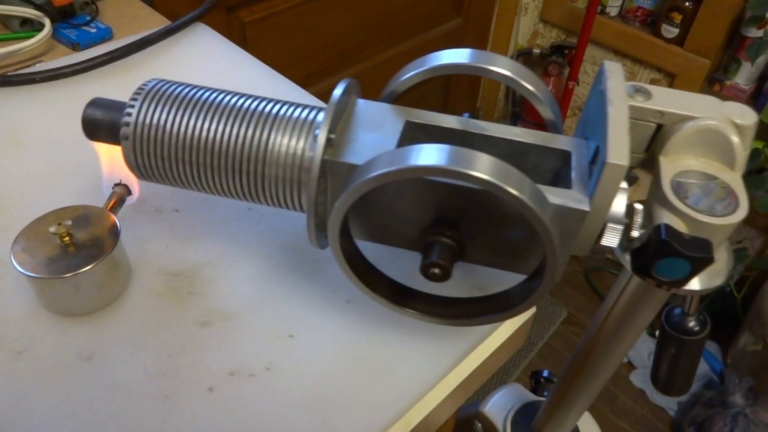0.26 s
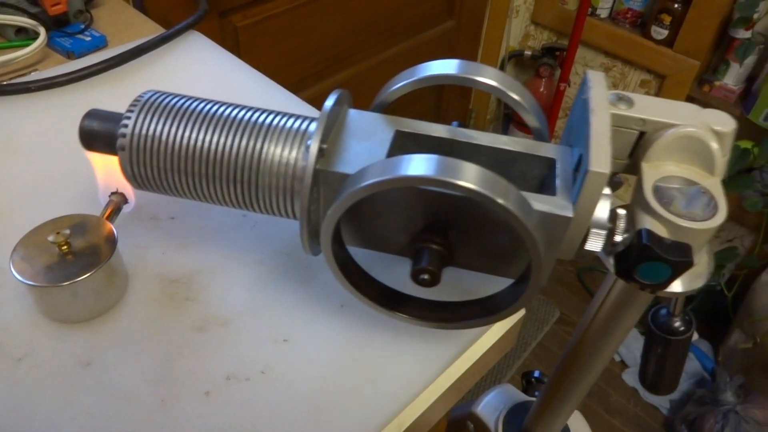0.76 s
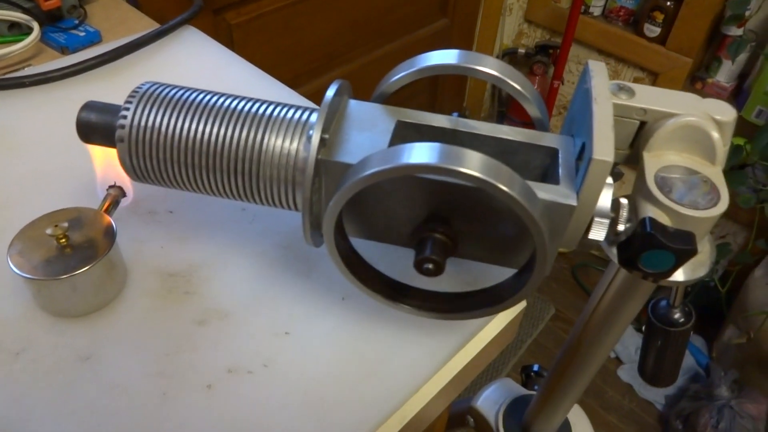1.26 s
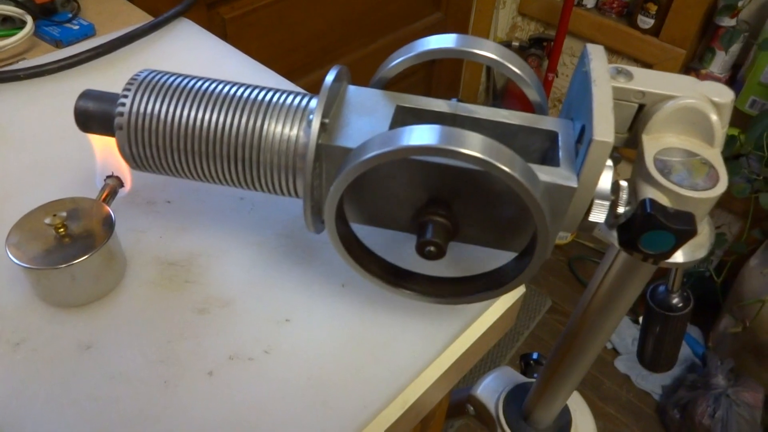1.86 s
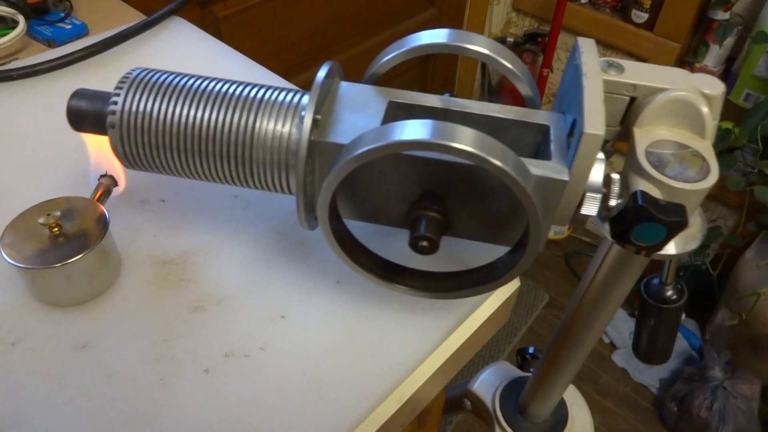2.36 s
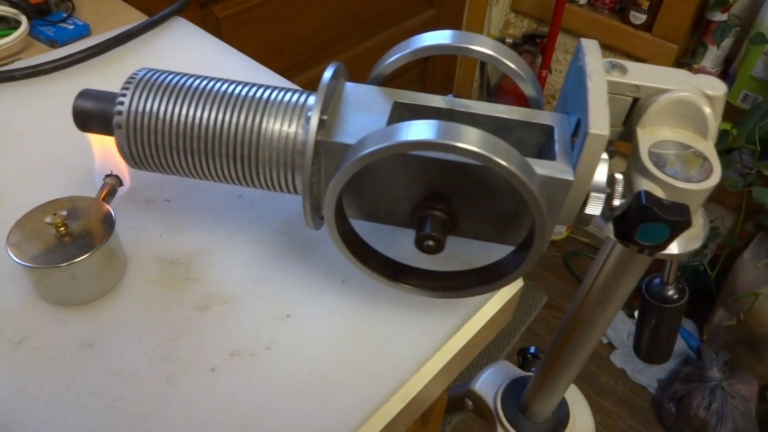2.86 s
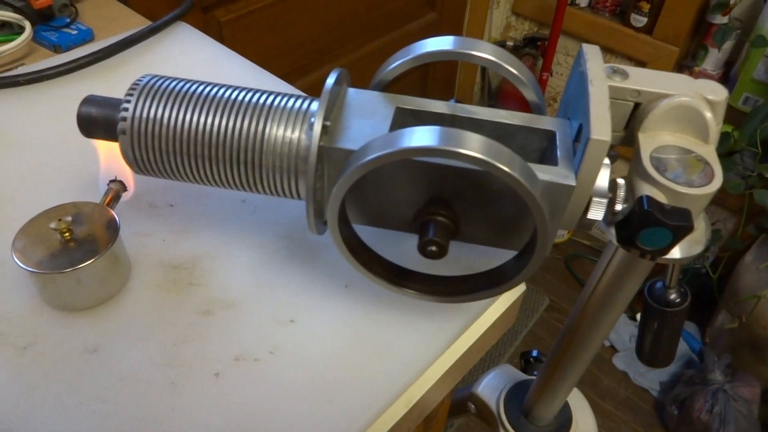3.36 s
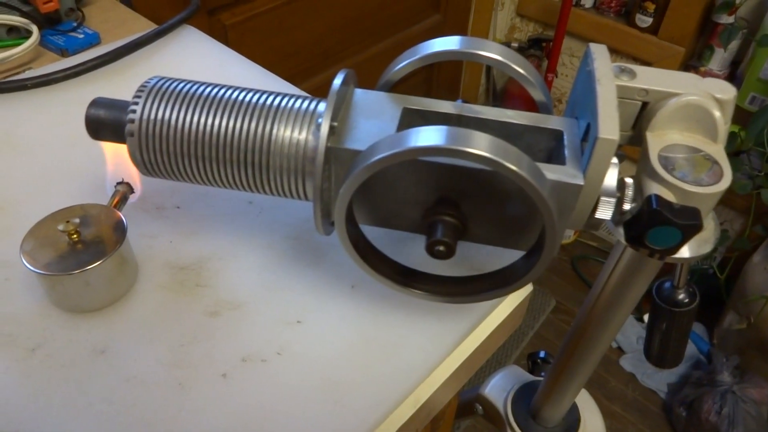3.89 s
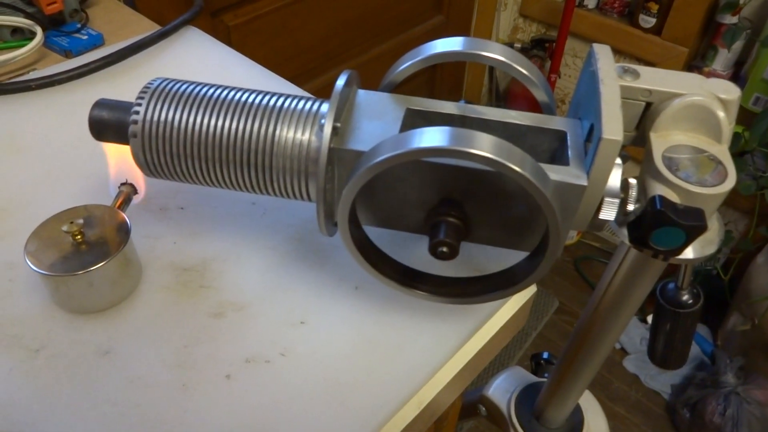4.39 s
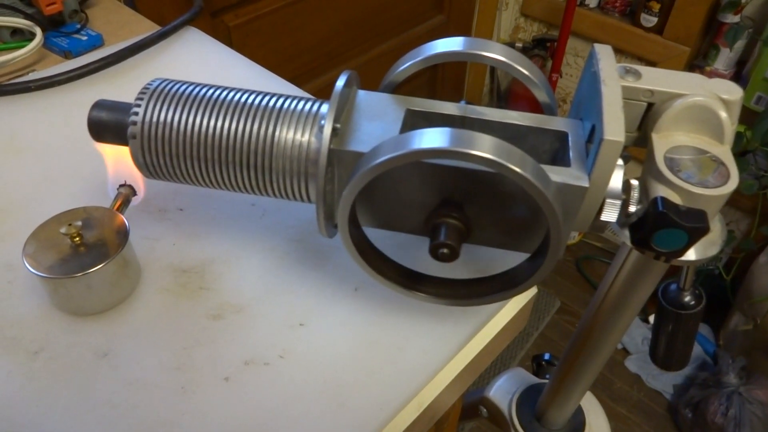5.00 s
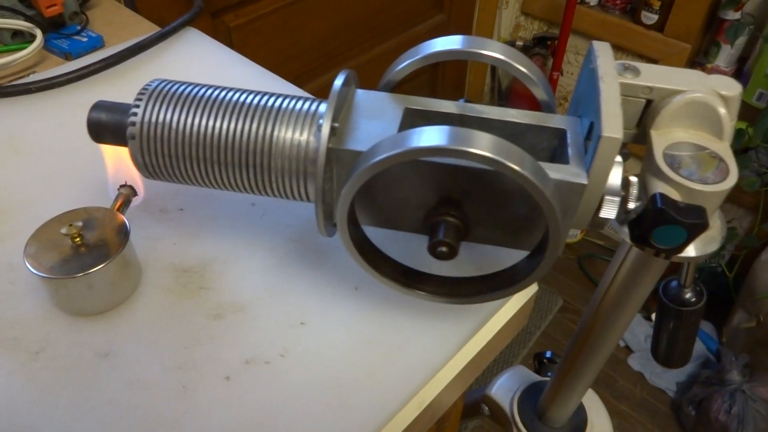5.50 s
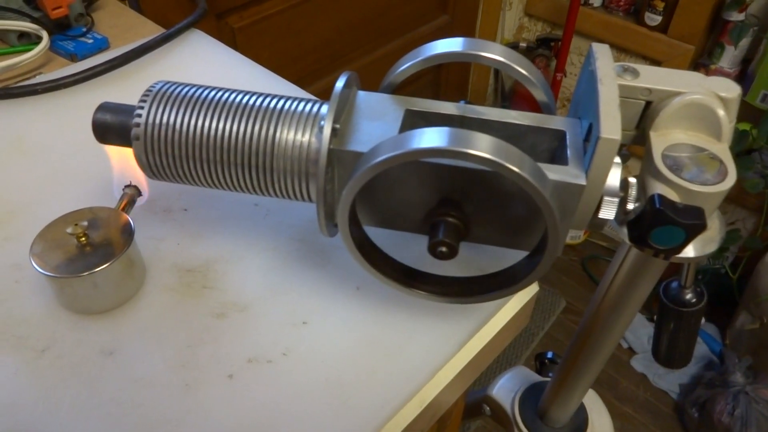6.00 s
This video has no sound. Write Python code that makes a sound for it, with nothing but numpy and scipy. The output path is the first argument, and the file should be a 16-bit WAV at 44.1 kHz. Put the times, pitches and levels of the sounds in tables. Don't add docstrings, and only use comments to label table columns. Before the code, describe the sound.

Rapid, even mechanical rattle of a little flywheel engine, hard dry clicks about fifty-seven a second, with a ringing metallic hum between them.

```python
import sys
import numpy as np
from scipy import signal
from scipy.fft import rfft, irfft, next_fast_len
from scipy.io import wavfile
from scipy.ndimage import uniform_filter1d

SR = 44100
rng = np.random.default_rng(int(sys.argv[2]) if len(sys.argv) > 2 else 0)


def makeup_ratio(level_db):
    decades = np.asarray(level_db, float) / 20
    return 10 ** decades


def to_wav(s):
    ch = np.atleast_2d(s).T
    pcm = np.round(np.clip(ch, -1, 1) * 32767)
    wavfile.write(sys.argv[1], SR, pcm.astype(np.int16))


N = 275565


def evened(x):
    return x / np.sqrt(np.mean(x ** 2) + 1e-20)


def read(points, hz):
    f, value = np.transpose(points)
    return np.interp(np.log(hz + 1), np.log(f + 1), value)


def colour(x, points):
    size = next_fast_len(len(x))
    gain = makeup_ratio(read(points, np.fft.rfftfreq(size, 1 / SR)))
    return irfft(rfft(x, size) * gain, size)[:len(x)]


def add(mix, s, sound):
    at = round(s * SR)
    part = mix[max(at, 0):][:max(len(sound) + min(at, 0), 0)]
    part += sound[max(-at, 0):][:len(part)]


# time_s, speed_turns_per_s
FLYWHEEL_SPEED = [(-.2, 14.0892), (1.1, 14.2177), (1.9, 14.3047), (2.5, 14.2987), (3., 14.3416),
                  (4., 14.368), (4.6, 14.3904), (5.2, 14.427), (6.4, 14.4608)]
START_TURN, LAST_TURN = -3.9076, 88


def crank():
    step_s = 1e-4
    s = np.arange(FLYWHEEL_SPEED[0][0], FLYWHEEL_SPEED[-1][0], step_s)
    return s, START_TURN + np.cumsum(np.interp(s, *np.transpose(FLYWHEEL_SPEED))) * step_s


# time_s, extra_db
SQUARE_HITS = [(1.73, 6), (1.80, 9), (1.94, 6), (2.43, 4), (2.57, 4), (3.41, 4), (3.69, 4), (4.66, 4),
               (4.80, 6), (5.64, 4)]


def loose_pin(t, now, level_db, detune):
    pin_hz, t60_s = 4770, .035
    square_db = sum(db for when, db in SQUARE_HITS if 0 < when - now < .06)
    decay = makeup_ratio(level_db + square_db - 60 * t / t60_s)
    return decay * np.sin(2 * np.pi * pin_hz * (1 + detune) * t)


FRAME_MODES = [(400, 4.4, -57, -6, 22, 0), (712, 14.3, -60, 4, 69, -2), (892, 19.6, -45, 13.5, 73.5, 3),
               (1106.7, 19.3, 150, -18, -152, 75), (1210.8, 84, 44, -15, -29, 54),
               (1246.6, 37.5, -79, 62, 11, -31), (1301.4, 31.8, -36, -17, 51, -81),
               (1656, 17.6, -57, -6, 31, -10), (1901, 8.9, -48, 19, 114, -12), (2184, 8.9, -60, -12, 51, -28),
               (2660, 14.7, 44, -9, 83, -11), (2960, 5.8, 201, 1, -203, -26),
                  (3436, 5.4, 38, -57, -140, -14), (3702, 14, -61, -12, 57, 5),
                  (3846, 8.5, 23, -96, 74, -1), (4167, 17.7, 185, -14, 24, -1),
                  (4510, 6.5, -67, 11, -177, -16), (4800, 20.7, -54, 9, 43, -8),
                  (6046, 6.8, -101, -38, -11, 6), (6570, 4.2, 26, 116, 50, -25),
               (7844, 34, -35, -9, 34, 15), (8160, 11.3, 178, -15, 70, 46),
                  (8360, 5.9, -180, 81, -88, -2), (9450, 2.4, -9, -33, -7, -44),
                  (10290, 32, -23, 14, 17, -1), (10830, 7.5, 118, 10, -45, 9), (12200, 14, -22, 5, 31, 4),
                  (13820, 11, -95, 0, -17, 1), (15260, 9, -66, 0, 2, -1), (15600, 8.0, 74, 1, -5, 0)]
# angle_turns, drift_turns_per_s, bend_turns_per_s2, scatter_ms
KNOCK_ANGLES = [
    (.00009, -.00066, .00009, .02),
    (.21197, .00478, -.00014, .25),
    (.40155, -.00067, .00005, .03),
    (.81393, -.00087, .00006, .04),
]
# blow_db, spread_db, low_mode_drift_db_per_s, high_mode_drift_db_per_s, loose_pin_db
KNOCK_BLOWS = [
    (.3, .3, .17, -.15, -48),
    (.4, .4, .1, -.3, -52),
    (.4, .35, .2, -.5, -35),
    (.8, .45, .35, .2, -55),
]
# level_db, dullness (0-1)
FACE_CRACKS = [
    (-19.5, 0.18),
    (-29.5, .98),
    (-23.5, 0.12),
    (-40, 0.2),
]
# frequency_hz, gain_db
CRACK_SPECTRUM = [(2000, -21), (4500, 5), (6000, -0.5), (8000, 4), (11000, -1.5), (13000, -15), (16000, 0)]


def knocks():
    settle_hz, settle_db, settle_s = 4040, -5.5, 2
    s, turn = crank()
    hz, t60_ms, *swings = np.transpose(FRAME_MODES)
    steps = np.arange(1050)[:, None] / SR
    fade = np.clip((steps[-1] - steps[:, 0]) / .006, 0, 1)
    height = np.log(hz / hz[0]) / np.log(hz[-1] / hz[0])
    rings, cracks = np.zeros(N), np.zeros(N)
    for place, blow, face, swing in zip(KNOCK_ANGLES, KNOCK_BLOWS, FACE_CRACKS, swings):
        angle, drift, bend, scatter_ms = place
        blow_db, spread_db, low_db, high_db, pin_db = blow
        crack_db, dull = face
        draws = rng.standard_normal((LAST_TURN + 2, 3, len(hz)))
        wander = evened(uniform_filter1d(draws, size=16, axis=0))
        lucks = .8 * wander + .6 * rng.standard_normal(draws.shape)
        surface = rng.standard_normal(len(steps))
        for k, luck in enumerate(lucks, -1):
            now = np.interp(k, turn, s)
            since_middle = now - N / SR / 2
            at = np.interp(k + angle + drift * now + bend * now ** 2, turn, s)
            at += scatter_ms / 1000 * draws[k + 1, 0, 0]
            t = np.maximum(steps + round(at * SR) / SR - at, 0)
            t_line = t[:, 0]
            rise = fade * makeup_ratio(blow_db + spread_db * luck[0, 1]) * (1 - np.exp(-t_line / .000106))

            tuned_hz = hz * (1 + .0009 * luck[1])
            shares_db = .5 * luck[2] + (low_db + (high_db - low_db) * height) * since_middle
            shares_db += settle_db * np.exp(-now / settle_s - ((hz - settle_hz) / 200) ** 2)
            modes = swing / 1000 * makeup_ratio(-60e3 * t / t60_ms) * np.sin(2 * np.pi * tuned_hz * t)
            ring = modes @ makeup_ratio(shares_db)
            pin = loose_pin(t_line, now, pin_db + 4.5 * draws[k + 1, 0, 2], .006 * luck[0, 3])
            add(rings, at, rise * (ring + pin))

            rough = 0.88 * surface + 0.74 * rng.standard_normal(len(t))
            grit = signal.lfilter([1, np.clip(dull, 0, 1)], 1, rough)
            crack = makeup_ratio(crack_db + high_db * since_middle) * grit * np.exp(-t_line / 0.0017)
            add(cracks, at, rise * crack)
    return rings + colour(cracks, CRACK_SPECTRUM)


def contacts(per_s, spread_db, alike):
    s, turn = crank()
    starts = np.interp(np.arange(-2, LAST_TURN + 1), turn, s)
    shape = (len(starts), round(SR * (starts[1] - starts[0])))
    sizes = makeup_ratio(spread_db * np.minimum(rng.exponential(1, (2, *shape)), 5))
    sizes *= rng.random((2, *shape)) < per_s / SR
    habit = sizes[0, 0] * evened(uniform_filter1d(rng.standard_normal(shape), size=30, axis=0))
    fresh = sizes[1] * rng.standard_normal(shape)
    alike = np.clip(alike, 0, 1)
    turns = np.sqrt(alike) * evened(habit) + np.sqrt(1 - alike) * evened(fresh)
    out = np.zeros(N)
    for at, hits in zip(starts, turns):
        add(out, at, hits)
    return out


def stirred(turn, levels_db, lags, sharp, rest_db):
    power = makeup_ratio(rest_db) ** 2
    for (angle, *_), db, lag in zip(KNOCK_ANGLES, levels_db, lags):
        u = (turn - angle) % 1 / max(lag, .01)
        swell = (u * np.exp(1 - u)) ** sharp
        power = power + (makeup_ratio(db) * swell) ** 2
    return np.sqrt(power)


# chatter_db, chatter_lag_turns, hum_db, hum_lag_turns
LOOSE_PARTS = [
    (-34, 0.084, -40, 0.084),
    (-36, 0.094, -34.5, 0.083),
    (-35.5, .1, -34.5, 0.13),
    (-44, 0.14, -32.5, 0.051),
]
# frequency_hz, gain_db
CHATTER_SPECTRUM = [(300, -20), (900, -5.5), (2600, -0.5), (4400, -3.5), (6500, -16), (8200, -6),
                    (9500, -10.5), (15500, -18.5)]
# frequency_hz, width_hz, level_db
HUM_MODES = [(1070.6, 55, -6), (1164, 15, 5.5), (1244, 31, 2.5), (1348, 42, 4.5)]


def slack():
    turn = np.interp(np.arange(N) / SR, *crank())
    chatter_db, chatter_lag, hum_db, hum_lag = np.transpose(LOOSE_PARTS)
    t = np.arange(2000) / SR
    body = np.zeros(len(t))
    for hz, width, db in HUM_MODES:
        decay = np.exp(-np.pi * width * t)
        body += makeup_ratio(db) * np.sqrt(width) * decay * np.sin(2 * np.pi * hz * t)
    hum = contacts(2000, 0.69, 0.85) * stirred(turn, hum_db, hum_lag, sharp=2.42, rest_db=-63)
    chatter = evened(colour(contacts(6000, 1.9, 0.51), CHATTER_SPECTRUM))
    chatter *= stirred(turn, chatter_db, chatter_lag, sharp=1.04, rest_db=-53)
    return chatter + signal.oaconvolve(hum, body / np.linalg.norm(body))[:N]


# frequency_hz, gain_db
SMALL_BODY = [(60, -40), (110, -7), (160, -4.5), (240, 0), (450, 0.5), (800, 0.68), (16000, 1.53)]


def engine():
    return colour(knocks() + slack(), SMALL_BODY)


# frequency_hz, t60_s
SHOP_DECAY = [(200, 0.14), (1000, 0.2), (4000, 0.087), (9000, 0.26), (16000, 0.054)]


def tail(start_ms):
    taps, gap = np.zeros(SR // 2), 20
    at = np.arange(round(start_ms * SR / 1000), len(taps) - gap, gap)
    places = at + rng.integers(0, gap, len(taps))[:len(at)]
    taps[places] = rng.choice([-1., 1.], len(taps))[:len(at)]
    hz, t, z = signal.stft(taps, SR, nperseg=256)
    decay = makeup_ratio(-60 * t / read(SHOP_DECAY, hz)[:, None])
    taps = signal.istft(z * decay, SR, nperseg=256)[1]
    return taps / np.linalg.norm(taps)


# delay_ms, signed_share
BENCH_ECHOES = [(1.29, -0.12), (2.31, -0.08), (3.06, 0.04), (3.7, -0.09), (3.92, 0.05), (4.08, -0.05),
                (5.51, -0.04), (7.21, -0.04), (7.55, 0.07), (8.32, -0.04)]
# frequency_hz, gain_db
WALL_RETURN = [(200, -15), (700, -25.5), (1200, -12), (2500, -10), (4500, -10), (8000, -21.5),
               (16000, -15.5)]


def workshop(x):
    wall_ms, wall_db = 8.6, -17.5
    taps = colour(tail(wall_ms), WALL_RETURN)
    for ms, share in BENCH_ECHOES:
        taps[round(ms * SR / 1000)] += share
    slap = np.diff(rng.standard_normal(200)) * np.exp(-np.arange(199) / 19.0)
    add(taps, wall_ms / 1000, makeup_ratio(wall_db) * slap / np.linalg.norm(slap))
    return signal.oaconvolve(x, taps)[:N]


# frequency_hz, density_db_per_hz
RUMBLE_SPECTRUM = [(30, -1), (50, 0), (100, -18), (125, -4), (250, -4), (400, -13.5), (800, -13),
                   (1500, -28)]
# frequency_hz, level_db (rms)
MAINS_LINES = [(59.2, -53), (118.7, -65.5), (302.1, -56.5), (159.4, -59.5), (249.8, -60.5), (368.3, -62),
               (15545, -66)]
# frequency_hz, gain_db
HISS_SPECTRUM = [(300, 1.5), (3000, -0.5), (8000, -7), (11000, -26), (13000, -16), (16000, -16)]


def background():
    t = np.arange(N) / SR
    lines = np.zeros(N)
    for hz, db in MAINS_LINES:
        lines += makeup_ratio(db) * np.sqrt(2) * np.sin(2 * np.pi * (hz * t + rng.random()))
    rumble = makeup_ratio(-54) * evened(colour(rng.standard_normal(N), RUMBLE_SPECTRUM))
    hiss = makeup_ratio(-48.5) * evened(colour(rng.standard_normal(N), HISS_SPECTRUM))
    return lines + rumble + hiss


# frequency_hz, gain_db
SIDE_SPECTRUM = [(100, -17), (400, -10), (700, -18.5), (1300, -22.5), (2400, -18), (4400, -19),
                 (8100, -17), (15000, -18)]
# frequency_hz, gain_db
BASS_LEAN = [(60, -30), (200, -22), (500, -42), (16000, -62)]


def stereo_spread(mid):
    z = signal.stft(mid, nperseg=512)[2]
    random_phase = np.exp(2j * np.pi * rng.random(z.shape))
    scattered = signal.istft(z * random_phase, nperseg=512)[1][:N]
    side = colour(scattered, SIDE_SPECTRUM) - colour(mid, BASS_LEAN)
    return np.array([mid + side, mid - side])


def scene():
    direct = engine()
    return stereo_spread(direct + workshop(direct) + background())


def band_limit(x):
    return signal.sosfilt(signal.butter(12, 17140, fs=SR, output="sos"), x)


def record(dry):
    edge = [(15500, 0.34), (15850, -3), (16050, -19), (17100, -36), (17200, -90)]  # frequency_hz, gain_db
    mix = np.array([colour(0.71 * np.tanh(v / .7), edge) for v in dry])
    return band_limit(mix)


dry = scene()
out = record(dry)
to_wav(out)
```